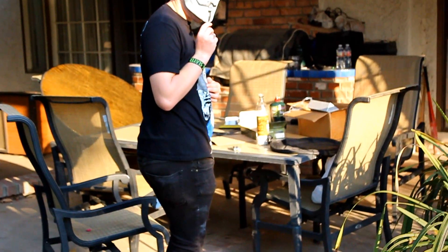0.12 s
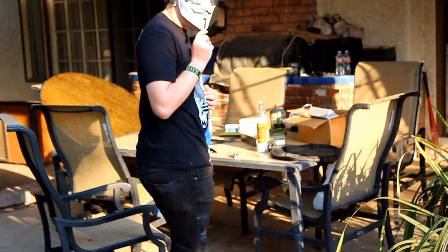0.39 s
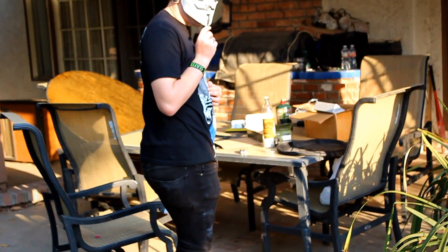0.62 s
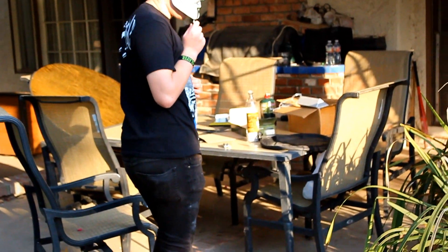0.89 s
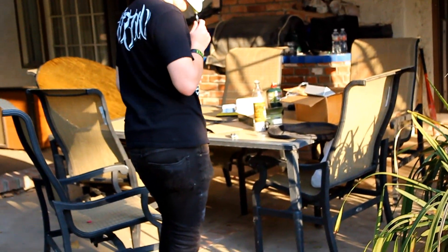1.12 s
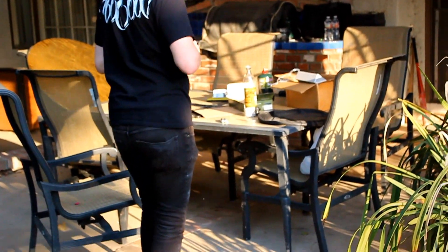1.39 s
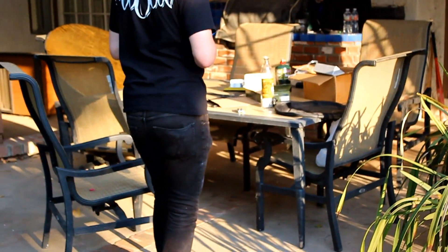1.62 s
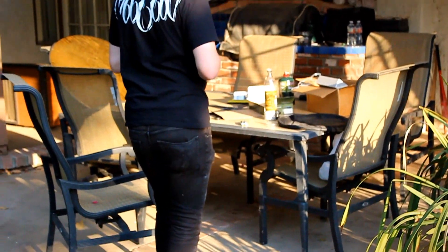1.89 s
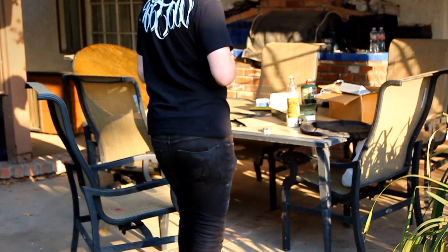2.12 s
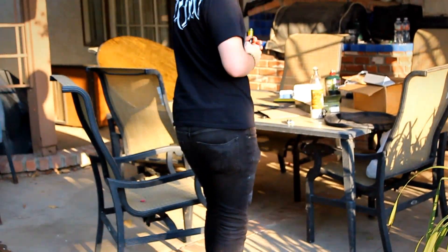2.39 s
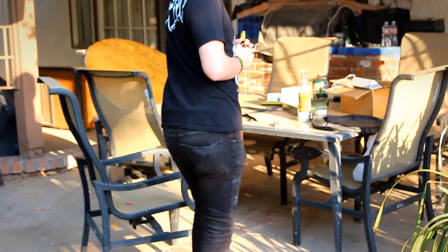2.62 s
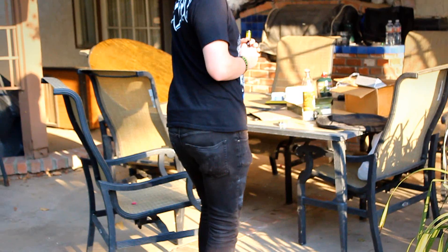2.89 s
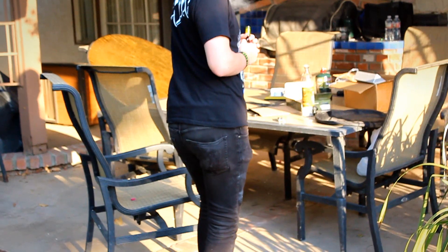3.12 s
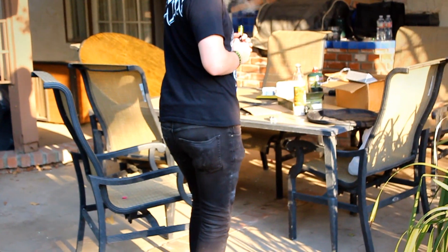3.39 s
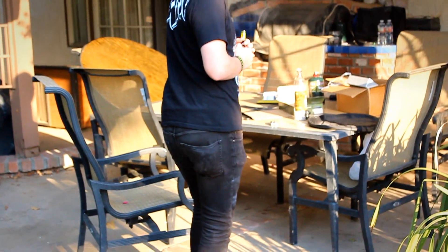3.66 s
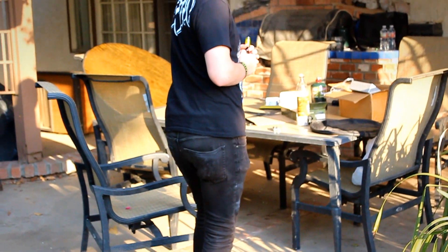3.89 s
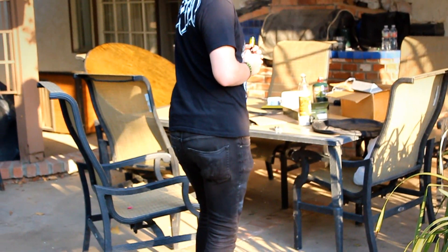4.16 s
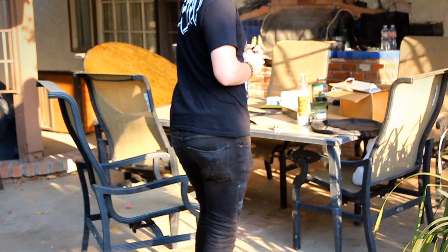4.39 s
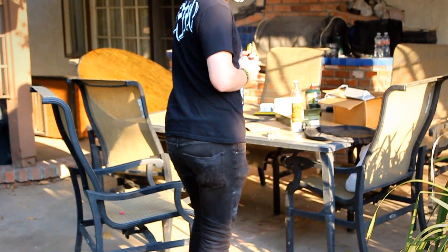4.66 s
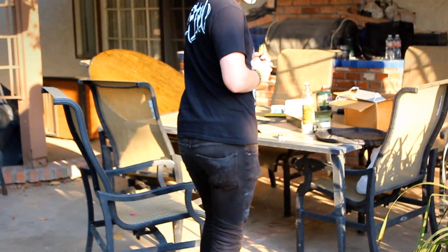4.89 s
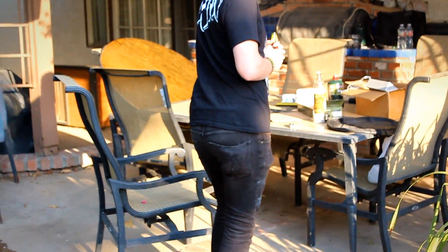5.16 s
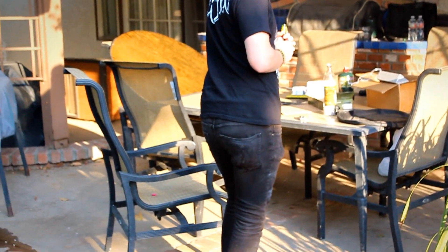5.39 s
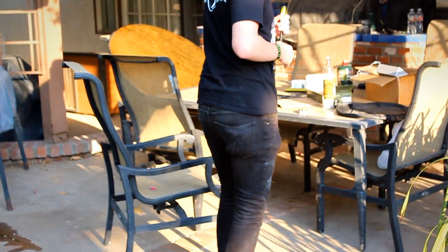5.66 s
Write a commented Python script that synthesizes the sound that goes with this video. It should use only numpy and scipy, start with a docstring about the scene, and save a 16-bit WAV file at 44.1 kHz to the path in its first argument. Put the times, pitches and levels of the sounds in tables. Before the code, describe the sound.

On a paved patio, cloth rustles and small gun parts click while wind bumps the microphone. A very loud, dry crack bursts out, overloading the input, with quick wall echoes, a fence slap and a short yard tail. Faint high pellet ticks follow, then a cluster of bright metallic clacks. After a quieter pause over a distant town hum, a second crack fires, and finally a shoe scuffs.

```python
"""A gas pistol fires twice on a paved patio: noise cracks with microphone resonances, low gas thumps, echoes of
walls and a far fence, and a noise tail of the yard. High-passed cracks make the pellet's ticks as it skips away.
Around the shots, resonant noise bursts click and rubbed noise slides as the gun's parts move; shaped noise
makes rustling clothes and a scuffing sole. Wind lumps buffet the microphone over a distant town hum.
The microphone's input overloads on loud peaks, and the level drops out once for an instant."""
import sys
import numpy as np
from scipy import signal
from scipy.fft import rfft, irfft, next_fast_len
from scipy.io import wavfile
from scipy.ndimage import uniform_filter1d, map_coordinates

SR = 44100
rng = np.random.default_rng(int(sys.argv[2]) if len(sys.argv) > 2 else 0)


def how_loud(loudness_db):
    """Turn decibels into a plain amplitude multiplier (0 dB gives 1, 20 dB gives 10)."""
    steps = np.asarray(loudness_db, float) / 20
    return 10 ** steps


def put_to_file(sound):
    """Save the sound as 16-bit audio at rate SR, in the file named by the first command-line argument."""
    columns = np.atleast_2d(sound).T  # one column per channel
    safe = np.clip(columns, -1, 1)
    whole_steps = np.round(safe * 32767)
    wavfile.write(sys.argv[1], SR, whole_steps.astype(np.int16))


N = 254759  # length in samples

# colour of the gas jet as the yard returns it: (f/Hz, relative level per Hz/dB)
BLAST = [(29, -49.5), (50, -12), (333, -2.5), (423, -4.5), (701, -4), (829, -9.5), (1160, -2), (1440, -6.5),
         (2960, -7), (3650, -3), (4600, -6.5), (9000, -11.5), (15500, -18.5)]


def unit(x):
    """Scaled to rms 1."""
    return x / np.sqrt(np.mean(x ** 2) + 1e-20)


def along(points, hz):
    """Interpolates (f/Hz, value) points on a log frequency axis."""
    f, v = np.transpose(points)
    return np.interp(np.log(hz + 1), np.log(f + 1), v)


def wobble(rate):
    """A smooth random curve with rate knots a second."""
    knots = rng.standard_normal(int(N * rate / SR) + 4)
    return map_coordinates(knots, [np.arange(N) * rate / SR])


def filtered(x, response):
    """x times a complex response of frequency."""
    m = next_fast_len(len(x) + 8192)
    return irfft(rfft(x, m) * response(np.fft.rfftfreq(m, 1 / SR)), m)[:len(x)]


def hiss(spectrum, size=N, lo_hz=0, hi_hz=SR):
    """Noise of rms 1 in the given colour, kept between two frequencies."""
    def colour(hz):
        return how_loud(along(spectrum, hz)) * (hz >= lo_hz) * (hz < hi_hz)
    return unit(filtered(rng.standard_normal(size), colour))


def resonances(modes):
    """The causal response of (f/Hz, width/Hz, level/dB) resonances with alternating signs."""
    def response(f):
        total = 0
        for k, (centre, width, db) in enumerate(modes):
            damping = 1j * f * width
            total = total + (-1) ** k * how_loud(db) * damping / (centre * centre - f * f + damping)
        return total
    return response


def steep(modes):
    """Resonances applied twice, with dark flanks; single modes count twice their dB."""
    return lambda f: resonances(modes)(f) ** 2


def add(track, s, sound):
    """Mixes a sound into the track from time s on."""
    start = track[round(s * SR):][:len(sound)]
    start += sound[:len(start)]


def swells(rows, edge):
    """One gain curve per level column of (t/s, length/s, level/dB..) rows: each event rises, holds and falls."""
    gains = np.zeros((len(rows[0]) - 2, N))
    for s, length, *levels_db in rows:
        shape = signal.windows.tukey(round(length * SR), np.clip(edge, 0, 1))  # edge: share of rise and fall
        for gain, db in zip(gains, levels_db):
            add(gain, s, how_loud(db) * shape)
    return gains


def crack(ring_db, sizzle_db, t60):
    """One arrival of the gas crack: broad noise, the microphone's ring near 3.7 kHz and sizzle near 14 kHz."""
    # ring and high sizzle of the microphone: (f/Hz, width/Hz, level/dB)
    mic_modes = [(3700, 520, 0), (14000, 2900, 0)]
    t = np.arange(2048) / SR
    ring, sizzle = (unit(filtered(rng.standard_normal(len(t)), steep([mode]))) for mode in mic_modes)
    shape = how_loud(-60 * t / t60) * (1 - np.exp(-t / 0.0017))
    return shape * (hiss(BLAST, size=len(t)) + how_loud(ring_db) * ring + how_loud(sizzle_db) * sizzle)


def dulled(sound, seconds, loss_db):
    """Air and rough walls take loss_db per second of travel at 10 kHz, growing with frequency squared."""
    return filtered(sound, lambda f: how_loud(-loss_db * seconds * (f / 10000) ** 2))


def thump(hz, turns):
    """A low push: a cosine whose swell peaks after so many turns, then dies fast."""
    u = np.arange(2048) / SR * hz
    return np.cos(2 * np.pi * u) * (u / turns) * np.exp(1 - u / turns)


def yard_tail(rise, late_db, stretch, lumpy_db):
    """The yard's answer builds up in uneven lumps; each frequency dies at its own speed, then far walls linger."""
    # decay time of the yard: (f/Hz, t60/s)
    yard = [(80, 0.14), (250, 0.29), (700, 0.31), (1900, 0.39), (4000, 0.37), (8000, 0.27), (11000, 0.23),
            (15500, 0.22)]
    hz, t, z = signal.stft(hiss(BLAST, size=SR), SR, nperseg=256)
    fall_db = -60 * t / along(yard, hz)[:, None]
    lumps = uniform_filter1d(rng.standard_normal(z.shape), size=24, axis=0)
    lumps = unit(uniform_filter1d(lumps, size=2, axis=1))
    fade = how_loud(fall_db) + how_loud(late_db + fall_db / stretch)  # near walls, then the slower, weaker far ones
    tail = signal.istft(z * how_loud(lumpy_db * lumps) * fade, SR, nperseg=256)[1][:SR]
    return tail * (1 - np.exp(-np.arange(SR) / SR / rise))


def pistol():
    """Hammer tick, gas crack with its echoes, the slide's low thump, the fence's double slap and the yard's tail."""
    # shots: (t/s, strength/dB, delay of the far fence/s)
    shots = [(1.547, -2.5, .066), (5.099, -2, .067)]
    # muzzle and near walls: (delay/s, level re strength/dB)
    echoes = [(0, 9.5), (.0035, 3.5), (.007, -1.5), (.010, -0.5), (.022, 6.5), (0.031, 6.5), (.043, 6.5),
              (.051, 9)]
    # the fence's double slap, then returns between fence and house: (extra delay/s, level re strength/dB)
    fence_slaps = [(0, 3.5), (.0055, 1.5), (.064, -11.5), (.15, -19.5), (.236, -28), (.321, -33)]
    ring_at_muzzle_db, ring_loss_db_per_s = 3, 230  # microphone ring over the crack; later echoes have less
    sizzle_at_muzzle_db, sizzle_loss_db_per_s = -3.5, 170.5  # the same for the high sizzle
    fence_ring_db = 4.5  # the fence's slaps excite the microphone's 3.7 kHz ring more
    out = np.zeros(N)
    for s, db, fence_delay in shots:
        hammer = crack(ring_db=-3.0, sizzle_db=-11.5, t60=0.017)
        add(out, s - .0035, how_loud(db - 25.5) * hammer)
        near = (s, echoes, ring_at_muzzle_db)
        far = (s + fence_delay, fence_slaps, ring_at_muzzle_db + fence_ring_db)
        for start, arrivals, first_ring_db in (near, far):
            for delay, echo_db in arrivals:
                ring_db = first_ring_db - ring_loss_db_per_s * min(delay, .05)
                sizzle_db = sizzle_at_muzzle_db - sizzle_loss_db_per_s * delay
                sound = crack(ring_db, sizzle_db, t60=0.018)
                travelled = dulled(sound, start + delay - s, loss_db=69.5)
                add(out, start + delay, how_loud(db + echo_db) * travelled)
        slam = s + .0147
        add(out, slam, how_loud(db + 10.5) * thump(hz=323, turns=0.24))
        add(out, slam + .0075, how_loud(db - 3.0) * thump(hz=387, turns=0.32))  # the slide springs back
        add(out, s, how_loud(db - 4.5) * thump(hz=65.0, turns=0.42))  # the puff of gas shoves the microphone
        add(out, s + 0.052, how_loud(db - 18.5) * thump(hz=232, turns=2.5))  # the porch booms
        tail = yard_tail(rise=0.013, late_db=-19.5, stretch=1.94, lumpy_db=1.0)
        add(out, s, how_loud(db + 2.0) * tail)
    return out


def pellet():
    """The spent pellet skips over the paving: each bounce is a tiny, very high tick, a high-passed crack."""
    # bounces: (t/s, level ahead of the high-pass/dB)
    bounces = [(1.6493, -27), (1.6955, -33), (1.9345, -54), (2.0177, -54), (5.2594, -35), (5.3796, -47)]
    out = np.zeros(N)
    for s, db in bounces:
        tick = crack(ring_db=-15, sizzle_db=1.5, t60=.01)
        add(out, s, how_loud(db) * filtered(tick, lambda f: (f * f / (f * f + 7000 ** 2)) ** 2))
    return out


def gun_clicks():
    """Each click is a sharp contact that rings the gun body; the spot that is hit adds its own pitch."""
    # contacts: (t/s, tick peak/dB, dull knock re tick/dB, bright snap re tick/dB, pitch of the spot f/Hz)
    contacts = [(0.1996, -43, 0, -12, 2580), (.2494, -44.5, 2, -12, 520), (0.4822, -39, -9, -19, 3120),
                (0.72, -48, -10, 0, 3300), (0.894, -45.5, -23, 1, 3860), (1.035, -38, 1.5, -15, 4200),
                (1.13, -36, -11, -19, 3340), (1.165, -30, 7.5, -19, 1150), (1.1913, -44.5, 17, -24, 1220),
                (1.3228, -44, 0, -7, 2870), (1.359, -48.5, 11, -18, 1190), (1.4498, -44.5, 1.5, -22, 2870),
                (2.0684, -48, 7, -9, 618), (2.149, -46.5, 7, -19, 762), (2.2905, -27.5, -1.5, -20.5, 812),
                (2.3698, -25, -8, -28, 3700), (2.3763, -22, -20, -5, 3790), (2.3812, -30, -10, -15, 4190),
                (2.4012, -39, 10.5, -24, 566), (2.524, -21, -11, -20, 3990),
                (2.594, -18.5, -15.5, -10, 3700), (2.6004, -27, -12, -18, 3490),
                (2.662, -58.5, 18, -13, 1240), (2.896, -47.5, -5.5, -10, 4740), (3.086, -40, 4.5, -27, 860),
                (3.174, -40.5, -14, -29, 3407), (3.4394, -61.5, -4, 8, 3598), (4.42, -53, -12, -15, 4770),
                (5.6159, -53.5, 2, -3.5, 1123)]
    # low, middle and high modes of the gun body: (f/Hz, width/Hz, level ahead of steep()/dB)
    parts = [
        [(613, 255, -7), (1720, 1300, -5)],
        [(2307, 520, -2.5), (3505, 950, -0.5), (5060, 1770, -6)],
        [(7417, 8200, 0.5), (13620, 2600, 2)],
    ]
    knock_below_hz = 2000  # lower spots colour the knock, higher ones the tick
    out, t = np.zeros(N), np.arange(2048) / SR
    for s, db, knock_db, snap_db, hz in contacts:
        if hz < knock_below_hz:
            own = ([(hz, 150, 2.5)], [], [])
        else:
            own = ([], [(hz, 350, 1.5)], [])
        layers = []
        for modes, spot, t60 in zip(parts, own, (.022, .011, .008)):
            burst = rng.standard_normal(len(t)) * how_loud(-60 * t / t60)
            layers.append(unit(filtered(burst, steep(modes + spot))))
        knock, tick, snap = layers
        click = tick + how_loud(knock_db) * knock + how_loud(snap_db) * snap
        add(out, s, how_loud(db) / np.abs(tick).max() * click)
    return out


def gun_slides():
    """Parts rub: broad noise and a resonant squeak share a chattering, stick-and-slip level."""
    # strokes: (start t/s, end t/s, starting level/dB, squeak f/Hz, fade over the stroke/dB)
    strokes = [(1.127, 1.162, -51.5, 3280, -1), (1.16, 1.274, -36, 1370, 27.5),
               (1.314, 1.398, -52, 3730, -1), (2.35, 2.386, -41.5, 3420, -6), (2.376, 2.402, -33, 4330, 26),
               (2.527, 2.58, -55.5, 3970, -2), (2.575, 2.619, -39.5, 3500, 12)]
    # colour of the rubbing: (f/Hz, relative level per Hz/dB)
    rub = [(240, 1), (400, -9.5), (668, -3), (1550, -9.5), (3150, -9.5), (3480, -6), (5040, -28),
           (12000, -64), (15600, -67), (22000, -120)]
    out = np.zeros(N)
    for start, end, db, hz, fade_db in strokes:
        size = round((end - start) * SR)
        squeak = unit(filtered(rng.standard_normal(size), steep([(hz, 400, 0)])))
        chatter_db = 3.25 * wobble(248)[:size]  # stick and slip
        level = how_loud(np.linspace(db, db - fade_db, size) + chatter_db)
        stroke = signal.windows.tukey(size, .4) * level
        add(out, start, stroke * (hiss(rub, size=size) + how_loud(-6.5) * squeak))
    return out


def rustle():
    """Cloth moving: a flickering rush of noise whose body and crisp treble have levels of their own."""
    # movements: (t/s, length/s, body level/dB, crisp treble level/dB)
    moves = [(0, 0.43, -64, -78.5), (.25, 0.43, -60, -66.5), (.5, 0.41, -57.5, -76.5), (.8, 0.4, -56, -63),
             (1.16, 0.17, -59, -68.5), (1.28, 0.32, -55.5, -67.5), (4.06, 0.21, -57.5, -69),
             (4.1, 0.414, -62, -78.5)]
    # colour of the cloth: (f/Hz, relative level per Hz/dB)
    cloth = [(180, -40), (300, -5.5), (544, -3), (758, -10), (1200, -9), (2080, -14), (2900, -10),
             (3650, -5), (5430, -19), (12600, -18.5), (15600, -27)]
    body, crisp = swells(moves, edge=.85)
    flicker = how_loud(1.4 * wobble(90))
    return flicker * (body * hiss(cloth, hi_hz=6220) + crisp * hiss(cloth, lo_hz=5877))


def scuff():
    """A sole drags over the paving: rough noise in the shoe's resonances, with grit on top."""
    # drags on stone: (t/s, length/s, drag level/dB, grit level/dB)
    drags = [(5.63, 0.091, -44, -59), (5.7, 0.1, -42, -51.5)]
    # resonances of the shoe: (f/Hz, width/Hz, level/dB)
    sole = [(777, 230, -9), (1150, 100, 1), (1473, 200, -10), (1940, 232, -9)]
    drag_gain, grit_gain = swells(drags, edge=.7)
    drag = unit(filtered(rng.standard_normal(N), resonances(sole)))
    grit = unit(filtered(rng.standard_normal(N), steep([(3610, 1300, 0)])))
    roughness = how_loud(1.22 * wobble(70))
    return roughness * (drag_gain * drag + grit_gain * grit)


def wind():
    """Wind lumps hit the microphone, shake its mount and die away over a fitful breeze."""
    # lumps: (t/s, level ahead of rise and decay/dB, t60/s)
    lumps = [(.17, -32.5, 0.48), (.725, -27, .5), (.86, -29.5, 0.43), (.995, -20.5, 0.41),
             (1.13, -35.5, 0.34), (1.2, -29, 0.55), (1.26, -31.5, 0.22), (1.4, -37, 0.54),
             (1.84, -37, 0.28), (2.34, -38, 0.47), (4.22, -34.5, .4), (4.41, -33.5, 0.41), (4.69, -31, .25)]
    # colour of the buffeting: (f/Hz, relative level per Hz/dB)
    buffet = [(8.8, -34), (15, -4), (48, 5), (94, -14), (118, -22.5), (200, -21.5), (260, -49), (440, -120)]
    # colour of the upper bass at the front of each lump: (f/Hz, relative level per Hz/dB)
    flutter = [(60, -29.5), (100, 0), (250, -0.5), (350, -12.5), (600, -51.5)]
    rise_s, flutter_db, breeze_db = 0.013, -14, -49.5  # flutter is relative to its lump
    flap_hz, flap_wander = 43, 0.079  # shaking of the mount: pitch and its relative wander
    gusts, fronts, t = np.zeros(N), np.zeros(N), np.arange(SR // 2) / SR
    for s, db, t60 in lumps:
        rise = 1 - np.exp(-(t / rise_s) ** 2)
        add(gusts, s, rise * how_loud(db - 60 * t / t60))
        add(fronts, s, rise * how_loud(db + flutter_db - 70 * t / t60))  # dies sooner than the lump
    flap = np.sin(2 * np.pi * np.cumsum(flap_hz * (1 + flap_wander * wobble(15))) / SR)
    breeze = how_loud(breeze_db) * unit(how_loud(4 * wobble(11)))
    noisy = (how_loud(-3.5) * gusts + breeze) * hiss(buffet)
    return how_loud(2) * gusts * flap + noisy + fronts * hiss(flutter)


def town():
    """The distant town: a wavering low hum of noise and a smooth far hiss above it."""
    # colour of the town: (f/Hz, relative level per Hz/dB)
    town_colour = [(24, -38), (40, -17.5), (80, 1.5), (166, -7.5), (198, -12.5), (260, -19), (351, -25.5),
                   (707, -30), (1080, -32.5), (1320, -35), (1500, -37.5), (2120, -43.5), (3580, -37.5),
                   (5210, -47), (15600, -52.5)]
    hum = how_loud(-44.5) * unit(how_loud(1.2 * wobble(12))) * hiss(town_colour, hi_hz=257.2)
    far_hiss = how_loud(-57.5 + 0.2 * wobble(2.3)) * hiss(town_colour, lo_hz=252.0)
    return hum + far_hiss


def scene():
    """All sources at the single microphone."""
    handling = gun_clicks() + gun_slides()
    return (pistol() + pellet() + handling + rustle() + scuff() + wind() + town())[None]


def roll_off(x):
    """The treble ends steeply here."""
    return signal.sosfilt(signal.butter(12, 15790, fs=SR, output="sos"), x)


def record(dry):
    """The signal drops out once for an instant, and the input stage clips hard at full scale."""
    # the dropout: (t/s, half width/s, depth/dB)
    dropout = (5.355, 0.0044, 15)
    s, width, depth_db = dropout
    dip = np.exp(-((np.arange(N) / SR - s) / width) ** 2)
    x = dry * how_loud(-depth_db * dip)
    clipped = x / (1 + np.abs(x) ** 8) ** (1 / 8)
    return roll_off(clipped)


dry = scene()
out = record(dry)
put_to_file(out)
```